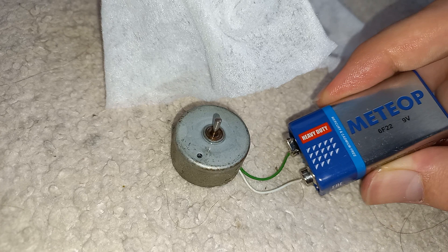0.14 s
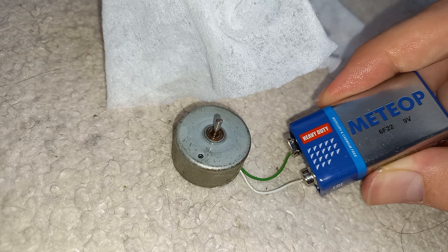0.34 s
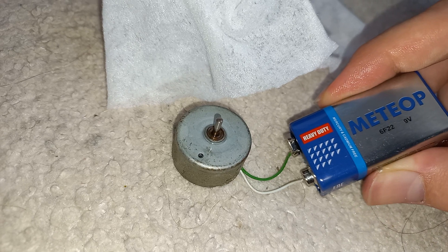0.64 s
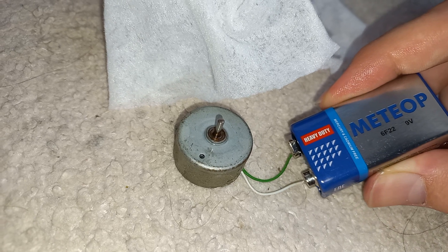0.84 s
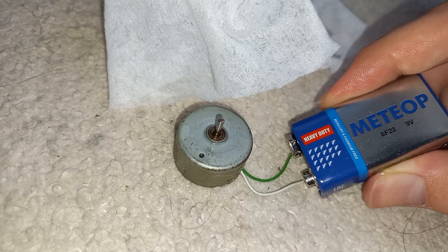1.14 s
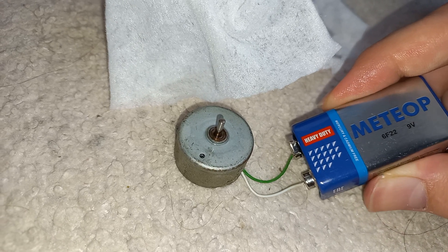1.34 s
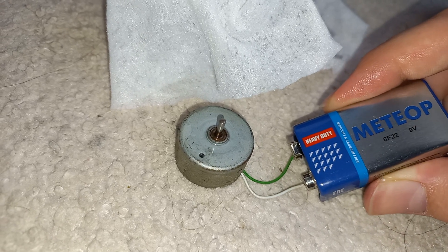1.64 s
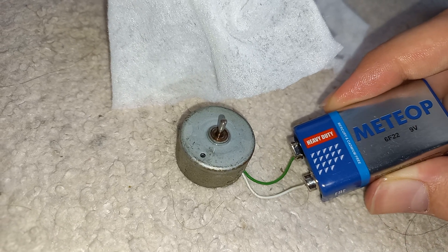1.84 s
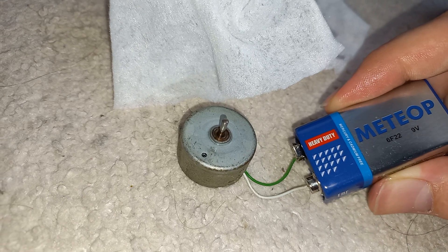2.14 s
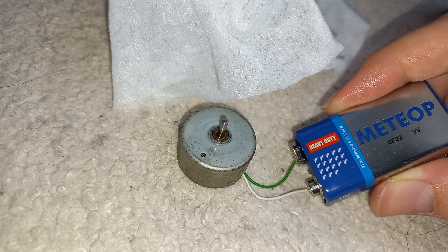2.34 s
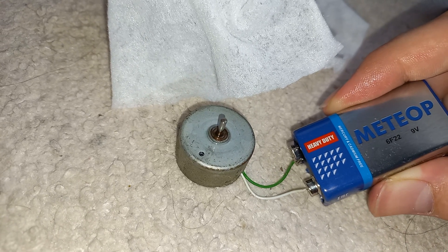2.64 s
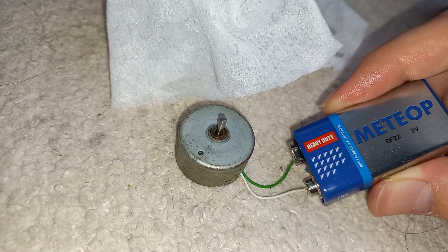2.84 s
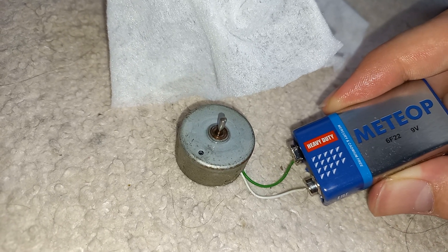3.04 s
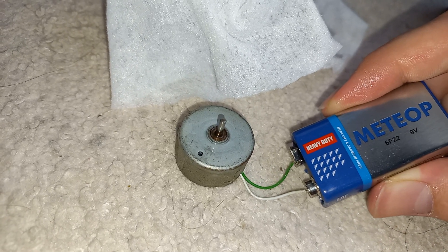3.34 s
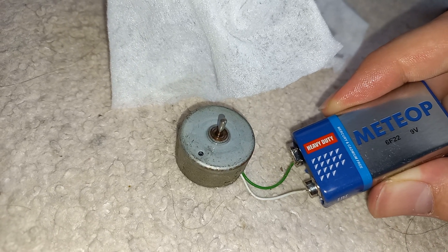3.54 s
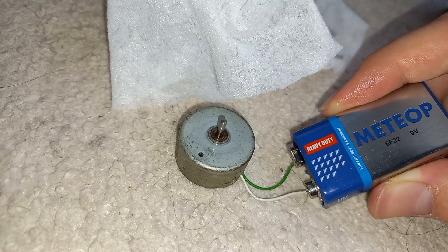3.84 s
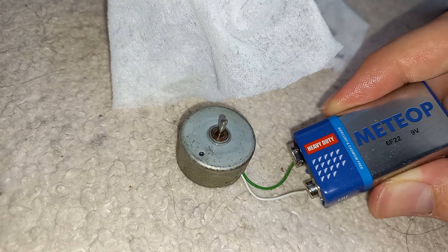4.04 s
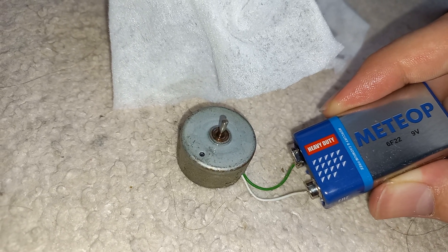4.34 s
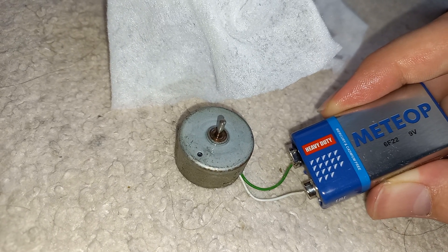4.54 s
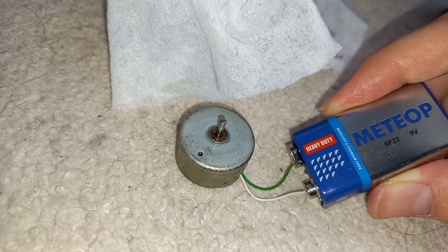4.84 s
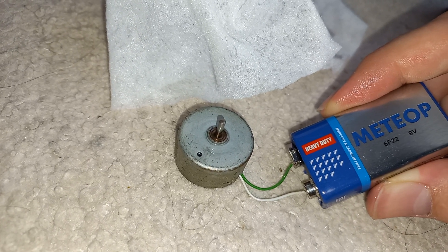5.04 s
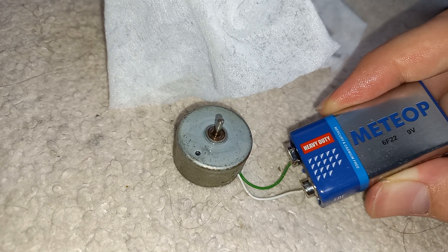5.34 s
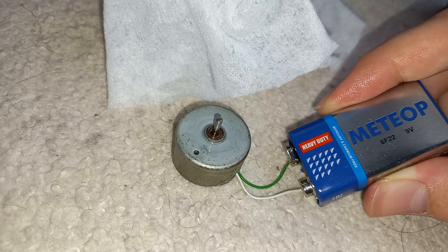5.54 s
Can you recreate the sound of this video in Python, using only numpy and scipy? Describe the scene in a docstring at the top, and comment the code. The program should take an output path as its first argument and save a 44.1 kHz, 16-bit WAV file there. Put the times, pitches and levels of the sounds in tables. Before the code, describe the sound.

Close up, a little battery-powered motor whirs faintly, its dry bearing letting out a sharp squeak about once a second.

```python
"""In a quiet room, a small bare electric motor runs off a battery on a foam block, very close by.
Its brushes (the sliding contacts) hiss, and its shaft rubs once a turn. Near top speed the shaft
rattles in its dry bearing, catches, and whirls round inside it with a squeal. This brakes the motor,
and the squeal collapses into a short growl. Then the shaft comes free and the motor spins up again."""
import sys
import numpy as np
from scipy import signal
from scipy.fft import rfft, irfft, next_fast_len
from scipy.io import wavfile

SR = 44100
rng = np.random.default_rng(int(sys.argv[2]) if len(sys.argv) > 2 else 0)


def transcribe(u):
    """Save the signal u as a 16-bit wav file named by the first command-line argument.

    u: samples, shape (n,) or (channels, n), limited to [-1, 1]; the rate is SR.
    q: integer samples, one column per channel.
    """
    v = np.clip(np.atleast_2d(u).T, -1, 1)
    q = np.round(v * 32767).astype(np.int16)
    wavfile.write(sys.argv[1], SR, q)


N = 251370
TIME = np.arange(N) / SR
TOP_SPEED = 85  # turns per second

# The times the shaft catches. Each row: when it catches, collapses into a growl and comes free,
# all in seconds, then the squeal's starting pitch in Hz and its base level in dB.
CATCHES = [(.355, .528, .588, 3120, -30.5), (1.246, 1.411, 1.468, 3075, -31),
           (2.087, 2.240, 2.259, 3055, -30.3), (3.082, 3.213, 3.264, 3043, -30.3),
           (3.928, 4.066, 4.115, 3062, -31), (4.913, 5.056, 5.061, 3060, -31.5),
           (5.593, 5.735, 5.785, 3015, -32.5)]


def from_db(db):
    """Turn decibels into a gain to multiply by."""
    return 10 ** (np.asarray(db) / 20)


def rms_one(x):
    """Scale a signal to an average power of 1."""
    return x / np.sqrt(np.mean(x ** 2) + 1e-20)


def drift(rate_hz):
    """A random wander of typical size 1, mostly slower than the given rate."""
    slow = signal.sosfilt(signal.butter(2, rate_hz, fs=SR, output="sos"), rng.standard_normal(N + SR))
    return rms_one(slow[SR:])


def swell(at, width_s=.0022):
    """The bell-shaped rise and fall of one burst of bounces."""
    return np.exp(-.5 * np.minimum(((TIME - at) / width_s) ** 2, 100))


def between(starts, ends):
    """1 from each start to its end, otherwise 0."""
    return sum(1.0 * ((TIME > start) & (TIME < end)) for start, end in zip(starts, ends))


def colour(x, points):
    """Shape the tone with one curve of (Hz, dB) points per channel; white noise keeps its power."""
    hz, *curves = np.transpose(points)
    size = 2 * next_fast_len(N // 2 + SR // 2)
    f = np.maximum(np.fft.rfftfreq(size, 1 / SR), 1)
    roll_off = np.minimum(f / hz[0], 1) ** 2 * np.minimum(hz[-1] / f, 1)
    gain = rms_one(roll_off * from_db([np.interp(np.log(f), np.log(hz), c) for c in curves]))
    # make the filter ring only after a hit, never before it
    cepstrum = irfft(np.log(gain + 1e-9))
    cepstrum[:, 1:size // 2] *= 2
    cepstrum[:, size // 2 + 1:] = 0
    return irfft(rfft(x, size) * np.exp(rfft(cepstrum)))[:, :N]


def rotor_speed(drag):
    """Turns per second: the battery pulls towards top speed, the bearing's drag towards a crawl."""
    start_speed, crawl_speed = 64, 33
    spin_up_s, brake_s = .46, .035
    settling = np.exp(np.cumsum(1 / spin_up_s + drag / brake_s) / SR)
    pull = TOP_SPEED / spin_up_s + drag * crawl_speed / brake_s
    return (start_speed + np.cumsum(pull * settling) / SR) / settling


def rub(contact, level_db, ring_hz, width_hz):
    """Once a turn the shaft scrapes its bearing, which makes the shaft bend and ring."""
    decay = np.exp(-np.pi * width_hz / SR)
    pole = decay * np.exp(2j * np.pi * ring_hz / SR)
    stick_slip = np.sin(2 * np.pi * np.cumsum(ring_hz * (1 + .0546 * drift(rate_hz=393))) / SR)
    scrape = contact * (stick_slip + 2.2 * rng.standard_normal(N))
    ringing = signal.lfilter([1 - decay], [1, -pole], scrape)
    # the ring reaches the right side later and weaker
    ears = np.array([rms_one(ringing.real), rms_one((ringing * np.exp(-2.1j)).real)])
    return from_db(level_db) * from_db([[.5], [-5.0]]) * ears


def brushes(angle, turn_pulse, level_db):
    """The brushes slide with a grainy hiss and tick faintly over six contact gaps each turn."""
    # How the metal case colours the hiss. Each row: frequency in Hz, left and right gain in dB.
    case_tone = [(1296, -16, -17), (1590, -11, -15.5), (2170, -7.5, -1), (3360, -6, -33.5), (4040, -5, 0),
                 (5040, -8.5, -11), (6750, -13.5, -11.5), (7230, -4, -4), (8760, -5.5, -9.5),
                 (9780, -12, -23.5), (10460, -20, -24.5), (12800, -17.5, -19.5), (16300, -19.5, -14.5)]
    gaps = np.diff(np.floor(6 * angle / (2 * np.pi)), prepend=0)
    ticks = gaps * from_db(3 * rng.standard_normal(N))
    sparks = signal.lfilter([1], [1, -np.exp(-1 / (.0006 * SR))], ticks)
    pressure = 1 + .81 * turn_pulse + .35 * np.cos(3 * angle) + 1.4 * sparks
    return from_db(level_db) * colour(rms_one(pressure * rng.standard_normal((2, N))), case_tone)


def room_tone():
    """The quiet room's faint, low noise, a little stronger on the left."""
    # The tone of that noise. Each row: frequency in Hz, relative level in dB.
    air_tone = [(15, -61), (25, -28), (91, -3), (126, -7), (152, -6), (234, -7.5), (415, -14), (492, -11),
                (659, -19), (1000, -22), (1300, -39), (2200, -120)]
    return from_db(-78) * colour(rng.standard_normal((2, N)), air_tone) * from_db([[2.2], [-2.2]])


def bursts():
    """List the shaft's bursts of bounces: time in seconds, base level in dB, rough bounces per second."""
    # Rattles made of evenly spaced bursts. Each row: first burst, last burst and rough spacing
    # in seconds, base level in dB, rough bounces per second.
    rattles = [(2.060, 2.080, .007, -38.5, 1700), (2.484, 2.484, .008, -40.5, 1750),
               (2.522, 2.527, .005, -41.5, 1250), (2.745, 2.787, .008, -37.5, 1720),
               (3.038, 3.043, .005, -40, 1850), (3.056, 3.072, .008, -37.3, 1550),
               (4.643, 4.670, .0135, -37.7, 1850), (4.810, 4.810, .008, -38.5, 2000)]
    growth_db_per_s, lead_s = 70, .003
    rows = []
    for first, last, spacing, level_db, per_s in rattles:
        times = np.linspace(first, last, 1 + int(round(abs(last - first) / spacing)))
        rows += [(at, level_db + growth_db_per_s * (at - times.mean()), per_s) for at in times]
    # one burst just before each catch, another just before the shaft comes free
    for catch, _, free, *_ in CATCHES:
        rows += [(catch - lead_s, -40.5, 2100), (free - lead_s, -43.5, 2150)]
    return rows


def rattle(growling, skid_db, skid_hz, speed_up):
    """The loose shaft bounces in its bearing, fastest mid-burst; it also skids under each growl."""
    # How the metal case colours the knocks. Each row: frequency in Hz, left and right gain in dB.
    case_tone = [(790, -51, -43), (1142, -4.5, -7), (1297, -9.5, -15.5), (1613, 9.5, 2), (1760, -5.5, -15),
                 (2220, 3.5, 3), (2460, -0.5, -14.5), (3100, 2.5, -37), (3880, -10, -3.5),
                 (5170, -15.5, -17), (6830, -21, -6.5), (7200, -8.5, -2.5), (9160, -0.5, -17),
                 (10540, -24.5, -19.5), (13200, -16.5, -25), (15300, -23.5, -13.5)]
    rows = bursts()
    detunes = np.exp(.15 * rng.standard_normal(len(rows)))  # each burst has its own pace
    powers, rates = [], []
    for (at, level_db, per_s), detune in zip(rows, detunes):
        bell = swell(at)
        powers.append((from_db(level_db) * bell) ** 2)
        rates.append(per_s * detune * (1 + speed_up * (bell - .6)))
    powers.append(from_db(skid_db) ** 2 * growling + 1e-16)
    rates.append(skid_hz)
    power = sum(powers)
    # bounces are nearly regular, so each burst is a tiny gritty chirp
    unevenness, scatter_db, grit = .17, 2.4, .45
    rate = sum(p * r for p, r in zip(powers, rates)) / power * np.exp(unevenness * drift(rate_hz=960))
    hits = np.diff(np.floor(np.cumsum(rate) / SR), prepend=0)
    hits *= from_db(scatter_db * rng.standard_normal(N))
    knocks = np.sqrt(power) * (rms_one(hits - hits.mean()) + grit * rng.standard_normal((2, N)))
    return from_db(-2.5) * colour(knocks, case_tone)


def whirl(events, partials, angle, wobble, rasp_db, throb_db, flutter_db, flutter_hz, jitter_hz,
          edge_s, sag, slip_s):
    """The caught shaft rolls round inside its bearing, sounding a stack of tones called partials."""
    out = np.zeros((2, N))
    # the worn, turning surface shifts some partials and makes each flutter
    flutter = [from_db(flutter_db * drift(flutter_hz) * min(k / 2, 1)) for k, *_ in partials]
    slip = [shift * angle + jitter * drift(jitter_hz) for *_, shift, jitter in partials]
    # friction wraps each partial in equally strong noise, so the weak ones sound raspy
    rasp = [from_db(rasp_db) * (drift(jitter_hz) + 1j * drift(jitter_hz)) / np.sqrt(2) for _ in partials]
    for start, end, start_hz, end_hz, level_db, crest_s in events:
        span = (TIME > start - 10 * edge_s) & (TIME < end + 10 * edge_s)
        t = TIME[span]
        along = np.interp(t, [start, end], [0, 1])
        caught = .5 * (1 + np.tanh((t - start) / edge_s))
        grip = caught * .5 * (1 - np.tanh((t - end) / edge_s))
        # the pitch glides fastest at first, when friction brakes hardest
        glide_hz = start_hz + (end_hz - start_hz) * (along + .299 * along * (1 - along))
        # it swoops up as the shaft catches and bends down as it lets go
        loose = 1 - caught + .5 * (1 + np.tanh((t - end) / slip_s))
        hz = glide_hz * (1 + wobble[span]) * (1 - sag * loose)
        phase = 2 * np.pi * np.cumsum(hz) / SR
        # the level throbs once a turn, ever deeper, with a crest at crest_s
        throb = np.cos(angle[span] - np.interp(crest_s, TIME, angle))
        level = np.sqrt(2) * grip * from_db(level_db + throb_db * along * throb)
        for k, (multiple, left0, left1, right0, right1, lag, *_) in enumerate(partials):
            sides_db = [left0 + (left1 - left0) * along, right0 + (right1 - right0) * along]
            gain = flutter[k][span] * from_db(sides_db) + rasp[k][span]
            tone = np.exp(1j * (multiple * phase + slip[k][span] - [[0], [lag]]))
            out[:, span] += level * np.imag(gain * tone)
    return out


def squeal(angle):
    """A fast, clean, sinking whirl; the slightly oval shaft bends the pitch as it turns."""
    # The squeal's tones. Each row: multiple of the pitch, left start and end gain in dB, right start
    # and end gain in dB, right lag in radians, shift in cycles per turn, phase jitter in radians.
    partials = [(1, 0.5, -3, -19.5, -10, 1.5, 0, 0.006), (2, -29, -33, -31, -32, 1.4, 1, 0.13),
                (3, -13.5, -18, -25.5, -13, -2, 0, 0.54), (4, -1.5, -5.5, -9, -8, 4, 4.5, 0.3),
                (5, -46, -25.5, -30, -39, 1.7, 4, .8)]
    end_hz = 2664
    events = [(catch, collapse, hz, end_hz, db, collapse) for catch, collapse, _, hz, db in CATCHES]
    oval = .0017 * np.sin(angle) + .0095 * np.sin(2 * angle) + .0034 * np.cos(4 * angle)
    wobble = oval + .0027 * drift(rate_hz=95)
    return whirl(events, partials, angle, wobble, rasp_db=-31, throb_db=3, flutter_db=2.3,
                 flutter_hz=136, jitter_hz=225, edge_s=.0014, sag=.22, slip_s=.0027)


def growl(angle):
    """A slower, rough whirl that keeps skidding and creeps up a little in pitch."""
    # The growl's tones. Each row: multiple of the pitch, left start and end gain in dB, right start
    # and end gain in dB, right lag in radians, shift in cycles per turn, phase jitter in radians.
    partials = [(1, -3, 2.5, -16, 2, 2.0, 0.0019, 0.036), (2, -17, -5, -14, -1, 2, 0, 0.73),
                (3, -13, -16.5, -14.5, -16.5, 1.06, 0, 0.58), (4, -4.5, -7, -7.5, -6.5, -0.5, 0.018, 0.19),
                (5, -31, -27, -34, -12, -3, 0, 1.3), (6, -13.5, -9.5, -18, -12, 4, 0, .8),
                (7, -21, -29, -21, -32, 1.5, 0.0097, 1.3), (8, -28, -5, -14, -45, -5, 0, 1.2)]
    start_hz, end_hz, base_db = 1945, 2005, -43
    events = [(collapse, free, start_hz, end_hz, base_db, collapse) for _, collapse, free, *_ in CATCHES]
    wobble = .024 * drift(rate_hz=120) + .012 * drift(rate_hz=900)
    return whirl(events, partials, angle, wobble, rasp_db=-29, throb_db=5, flutter_db=4,
                 flutter_hz=111, jitter_hz=324, edge_s=.0013, sag=.15, slip_s=.0011)


def room(x, wet_db, fade_s, dull_hz):
    """Nearby surfaces throw back a few echoes, and the room adds a faint, short tail."""
    # The echoes. Each row: left delay and right delay in seconds, gain in dB.
    echoes = [(.0031, 0.0027, -18), (.0074, 0.0064, -17), (0.0099, .0131, -17)]
    early = np.zeros_like(x)
    for *delays, db in echoes:
        delayed = [np.interp(TIME - delay, TIME, side, left=0) for delay, side in zip(delays, x)]
        early += from_db(db) * np.array(delayed)
    t = TIME[:SR // 2]
    tail = rng.standard_normal((2, len(t))) * from_db(-60 * t / fade_s) * (1 - np.exp(-t / .004))
    tail = signal.sosfilt(signal.butter(2, dull_hz, fs=SR, output="sos"), tail)
    tail /= np.sqrt(np.sum(tail ** 2, axis=1, keepdims=True))
    return x + early + from_db(wet_db) * signal.fftconvolve(x[:1], tail, axes=1)[:, :N]


def scene():
    """Work out how the motor turns, then add up its sounds and place them in the room."""
    catch, collapse, free, *_ = np.transpose(CATCHES)
    squealing, growling = between(catch, collapse), between(collapse, free)
    rattling = sum(swell(at) for at, *_ in bursts())
    speed = rotor_speed(drag=squealing + growling + .25 * rattling)
    angle = 2 * np.pi * np.cumsum(speed) / SR
    turn_pulse = np.exp(2.2 * (np.cos(angle) - 1))
    # friction grows with speed and wanders as the shaft shifts in its bearing
    octaves, wander = np.log2(speed / TOP_SPEED), drift(rate_hz=8.6)
    rub_db = -61.5 + 7 * octaves + 2.57 * wander
    brush_db = -64.5 + 5.5 * octaves + 1.4 * wander
    # each touch has its own force; a squealing shaft rolls instead of rubbing
    contact = (turn_pulse + .23) * from_db(2.55 * drift(rate_hz=25)) * (1 - squealing)
    motor = squeal(angle) + growl(angle) + rattle(growling, skid_db=-52, skid_hz=1918, speed_up=.4)
    motor += rub(contact, rub_db, ring_hz=1948, width_hz=234) + brushes(angle, turn_pulse, brush_db)
    return room_tone() + room(motor, wet_db=-24.5, fade_s=.18, dull_hz=4600)


def record(dry):
    """Cut off the very highest treble steeply."""
    cutoff_hz = 15850
    return signal.sosfilt(signal.ellip(12, .2, 80, cutoff_hz, fs=SR, output="sos"), dry)


dry = scene()
out = record(dry)
transcribe(out)
```